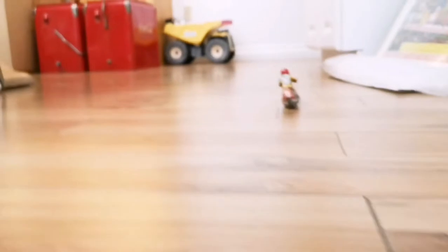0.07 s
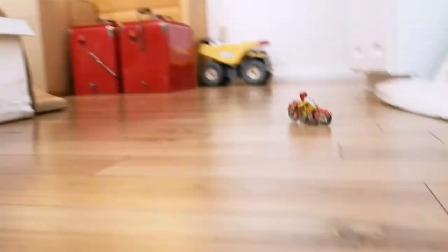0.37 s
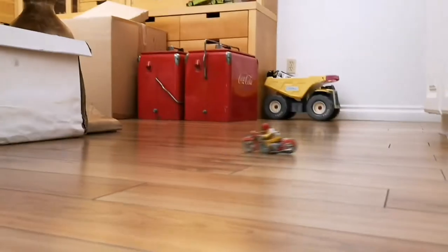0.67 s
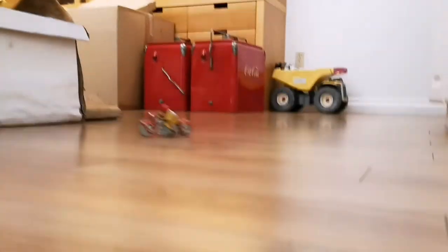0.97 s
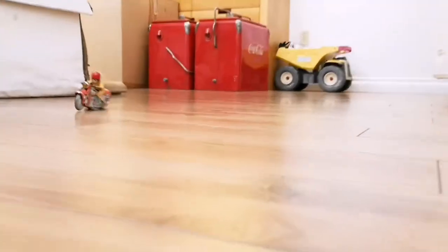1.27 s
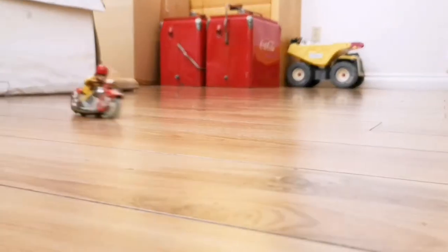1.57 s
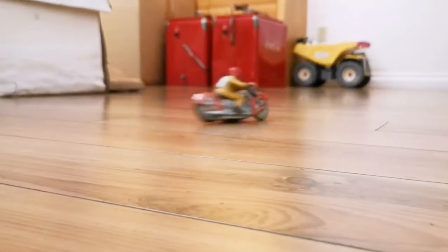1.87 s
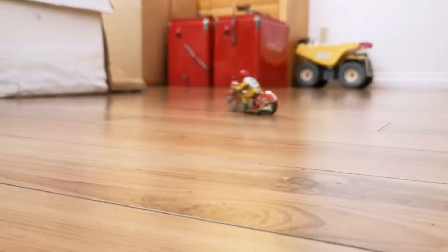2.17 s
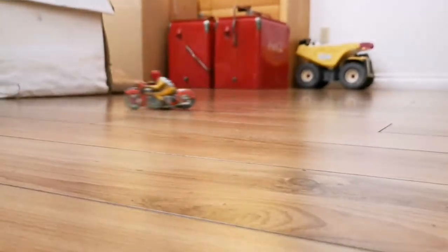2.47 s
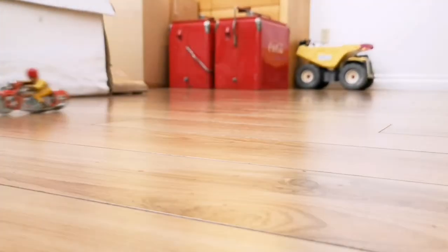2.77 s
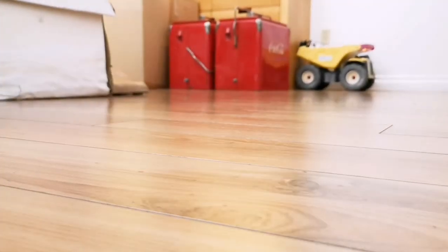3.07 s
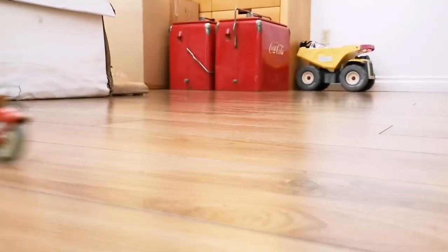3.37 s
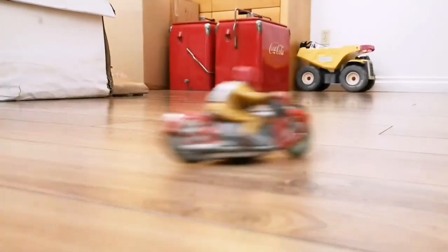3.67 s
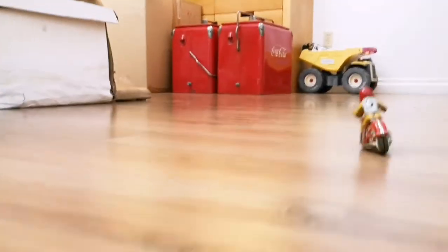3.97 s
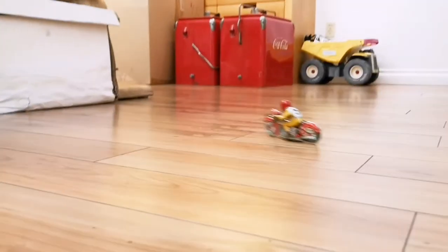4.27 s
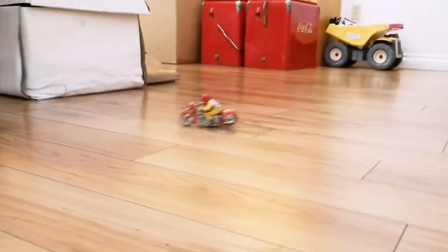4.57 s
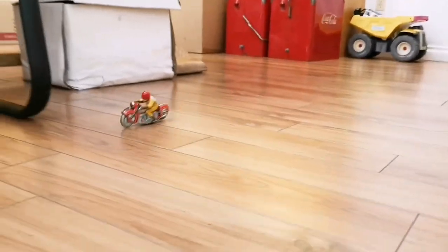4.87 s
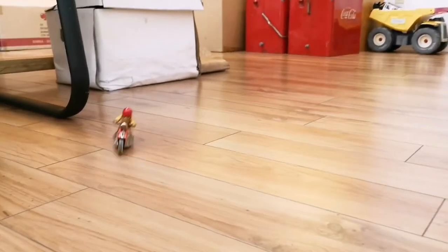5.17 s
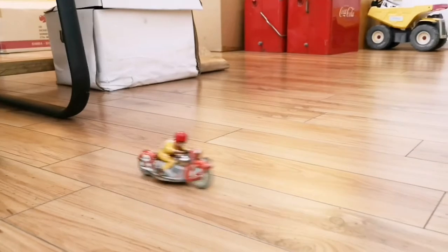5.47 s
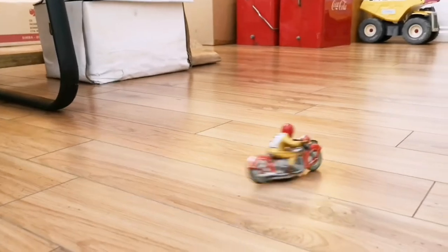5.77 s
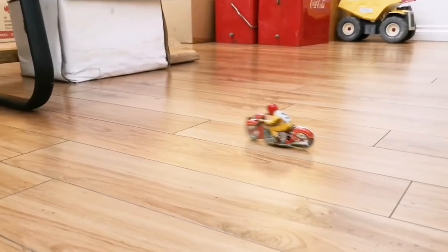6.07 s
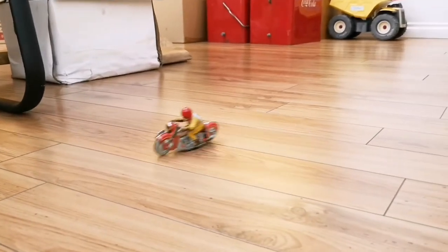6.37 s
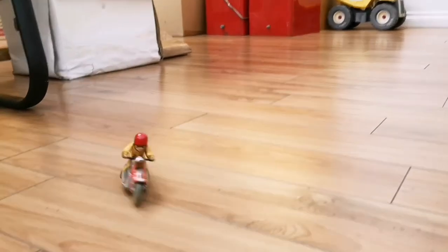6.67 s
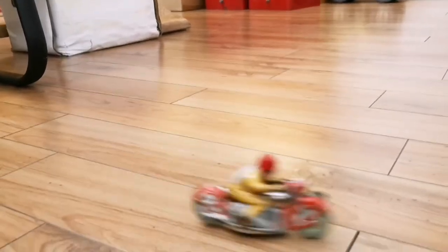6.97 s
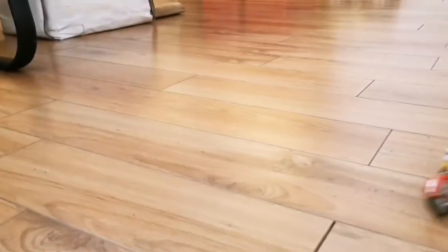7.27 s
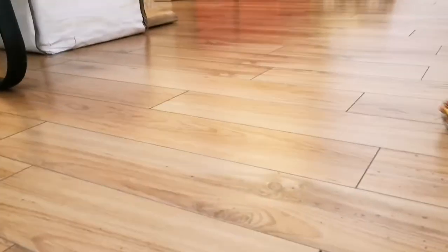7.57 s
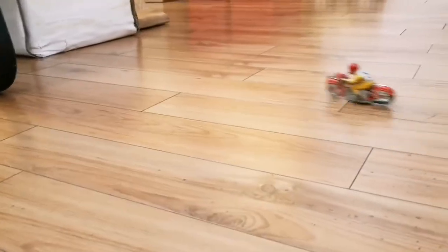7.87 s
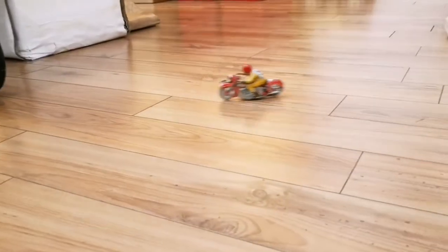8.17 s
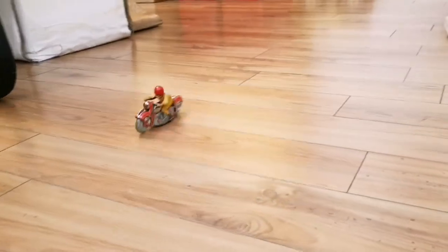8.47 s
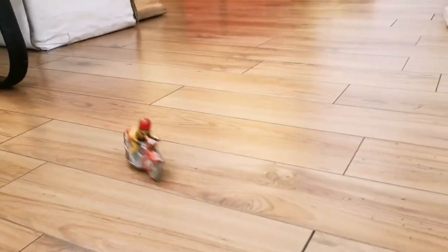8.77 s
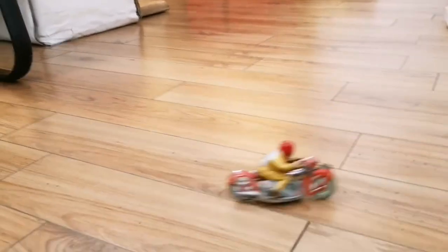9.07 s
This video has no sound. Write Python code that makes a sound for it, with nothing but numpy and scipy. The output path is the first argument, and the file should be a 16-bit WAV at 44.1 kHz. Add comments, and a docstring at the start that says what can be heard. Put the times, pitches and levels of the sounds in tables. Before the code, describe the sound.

A bright, buzzing metallic whirr runs throughout as a wind-up toy motorcycle drives laps on floorboards indoors. Its tin shell ticks and pings, and its wheels rattle unevenly with a brief scuff or two. The toy shifts in direction and brightness, often leaning left, and gets louder on two close passes by the microphone. Occasional dull bumps and a quiet hum sit beneath it, with a short room echo.

```python
"""A rasping metallic whirr circles on a wooden floor: a clockwork tin motorcycle, passing close twice.
Gear teeth drive the resonances of its shell, and loose tin parts strike it, clinking and jingling.
The wheels clatter and scuff, exciting their frame and the boards. Distance and heading on each lap
set the brightness and direction. A small room reverberates over a few soft bumps, a rumble and a hum."""
import sys
import numpy as np
from scipy import signal
from scipy.fft import rfft, irfft
from scipy.io import wavfile
from scipy.ndimage import map_coordinates

SR = 44100
rng = np.random.default_rng(int(sys.argv[2]) if len(sys.argv) > 2 else 0)


def log_audio(samples):
    """Write samples as a 16-bit WAV file to the path given in sys.argv[1]."""
    # one column per channel
    frames = np.atleast_2d(samples).T
    # limit to full scale, then quantise
    limited = np.clip(frames, -1, 1)
    pcm = np.round(limited * 32767).astype(np.int16)
    wavfile.write(sys.argv[1], SR, pcm)


N = 402191
TIME = np.arange(N) / SR

# The gear whirr. Each row: time in seconds, relative level in dB, left minus right in dB.
WHIRR_PATH = [(0.0, -31.5, 7.5), (0.53, -30.5, -4), (1.3, -28, 12.5), (1.8, -30.5, 14), (1.93, -33.5, 0),
              (2.35, -33, 8.5), (3.15, -27, 15), (3.6, -21, 7), (3.97, -30.5, -3.5), (4.24, -26, 1.5),
              (4.65, -32, 8), (5.3, -34, 5.5), (5.53, -32, 5), (5.9, -33.5, 5.5), (6.4, -35, 11),
              (6.8, -28, 5.5), (7.19, -23, 6), (7.5, -36.5, 0), (8.8, -37, -0.5), (9.12, -32, -5)]
# Modes of the tin body. Each row: frequency in Hz, 60 dB decay time in seconds, relative level in dB.
TIN_MODES = [(5695, .036, -5), (8412, .029, 1), (9365, .025, -5), (7590, .02, 0), (7920, .012, -3),
             (6630, .014, -9)]
# Spectra of the shell and of the teeth's fizz. Each row: frequency in Hz, relative level in dB.
SHELL_SPECTRUM = [(900, -46), (1600, -9), (3000, -12), (4300, -10.5), (5200, -3), (6400, -4), (7700, 7.5),
                  (8900, 3), (9900, -5), (11200, -19.5), (15500, -26.5)]
FIZZ_SPECTRUM = [(7000, -36), (9500, -8), (10500, 11.5), (11500, 5), (13000, 6.5), (15500, 0)]
# The shell's middle resonance and the fizz, strongest close by. Each row: time in seconds, level in dB.
MIDDLE_LEVEL = [(1.55, -49), (1.68, -27), (1.9, -54), (3.3, -40), (3.65, -34), (4.1, -66), (6.6, -50),
                (7.1, -41), (7.6, -44.5), (9.1, -44)]
FIZZ_LEVEL = [(0.0, -41), (0.07, -45), (1.35, -46.5), (1.73, -38.5), (1.93, -48), (2.56, -46),
              (3.63, -30.5), (3.66, -37), (3.91, -31), (4.52, -50), (5.84, -41), (5.99, -53), (6.76, -42.5),
              (7.11, -34.5), (7.42, -39), (7.54, -49), (8.33, -55), (9.12, -36)]
def gears(ticks_per_s=1100, beat_hz=190, rasp_db=9, middle_hz=6750):
    """Impact excitation: teeth tick into the shell in uneven beats, surging with the play in the train."""
    beat = np.cumsum(beat_hz * (1 + .2 * walk(60))) / SR % 1
    drive = unit(ticks(ticks_per_s, 5) * undb(0.83 * walk(70) + walk(18) - rasp_db * beat))
    whirr = undb(-3) * unit(colour(drive, SHELL_SPECTRUM)) + undb(-6.5) * resonate(drive, TIN_MODES[1:])
    middle = band(drive, middle_hz, width_hz=800) * undb(curves(MIDDLE_LEVEL)[0])
    low_sheen, high_sheen = sheen(drive)
    fizz = unit(colour(ticks(ticks_per_s, 5.2) * undb(walk(25)), FIZZ_SPECTRUM))
    fizz *= undb(curves(FIZZ_LEVEL)[0])
    return whirr * undb(curves(WHIRR_PATH)[0]) + middle, low_sheen, fizz + high_sheen


# Two shell resonances. Each row: time in seconds, relative levels of the lower and the upper in dB.
SHEEN_LEVELS = [(0.0, -54, -44), (0.07, -41, -46), (1.14, -60, -46), (1.4, -44, -32), (2.16, -40.5, -40),
                (3.12, -68, -50), (3.63, -34, -47), (4.62, -50, -48), (5.49, -58, -30.5),
                (5.69, -36.5, -50), (6.4, -52, -51), (6.65, -39, -33), (7.42, -37.5, -35), (7.67, -42, -49),
                (7.97, -31.5, -40), (8.15, -45, -44), (9.09, -43, -48), (9.12, -49, -51)]
def sheen(drive, lower_hz=5000, upper_hz=5400, high_hz=9400, swing_hz=550, rundown_db_per_s=2):
    """Forced resonance: two bands take turns; a third glides each lap and fades as the spring unwinds."""
    lower_db, upper_db = curves(SHEEN_LEVELS)
    lower = band(drive, lower_hz, width_hz=250) * undb(lower_db)
    upper = band(drive, upper_hz, width_hz=250) * undb(upper_db - 1)
    angle = lap_angle()
    heading_db = 6 * np.cos(angle - 2 * np.pi * 0.38)  # greatest 0.38 lap after the closest point
    high_db = -39 + circling()[0] + heading_db - rundown_db_per_s * TIME
    high = band(drive, high_hz + swing_hz * np.sin(angle), width_hz=550)
    return lower + upper, high * undb(high_db)


# Loose parts hit the shell. Each row: start in seconds, relative levels of blow and ring in dB.
CLINK_STRIKES = [(0.74, -17, -32), (1.465, -24, -45), (1.515, -24, -33), (1.708, -17, -29),
                 (1.8246, -16, -46), (2.442, -27, -23), (2.4663, -29, -18.5), (2.538, -35, -46),
                 (2.677, -34, -19.5), (2.716, -22, -24), (3.048, -28, -16), (3.1008, -20, -18),
                 (3.1303, -30, -17), (3.224, -14, -23), (3.272, -15, -21), (3.338, -18, -13.5),
                 (3.4276, -19, -27), (3.569, -16.5, -28), (3.698, -12.5, -34), (4.214, -17.5, -36),
                 (4.579, -34, -26), (4.647, -33, -22), (4.75, -24, -27), (4.906, -25, -39),
                 (5.073, -27, -26), (5.185, -25, -29), (5.546, -18, -40), (5.971, -15.5, -38),
                 (6.1083, -21, -40), (6.4185, -25, -30), (6.7385, -21, -21), (6.814, -14.5, -34),
                 (7.193, -13, -25), (7.386, -31, -23), (8.19, -28, -22)]
def clinks(buzz_t60=0.016, detune=0.002):
    """Free vibration: a loose part strikes the shell, buzzes against it and rings its strongest mode."""
    blows, buzz, rings = np.zeros((3, N))
    hz, t60, _ = TIN_MODES[1]
    for (s, blow_db, ring_db), bend in zip(CLINK_STRIKES, rng.standard_normal(len(CLINK_STRIKES))):
        add(blows, s, undb([blow_db + 19]))
        add(buzz, s, undb(blow_db + 6) * fade(buzz_t60))
        add(rings, s, undb(ring_db + 6) * ring(hz * (1 + detune * bend), t60))
    return colour(blows + buzz * rng.standard_normal(N), SHELL_SPECTRUM) + rings


# A loose tab hits the body. Each row: start in seconds, relative level in dB.
TAB_STRIKES = [(0.292, -20), (1.267, -23), (1.433, -20), (1.466, -19), (1.711, -21), (2.468, -18.5),
               (2.54, -18.5), (2.857, -20), (3.236, -18), (3.273, -27.0), (3.297, -19.5), (3.321, -26),
               (3.935, -32), (3.968, -20), (4.083, -29), (4.265, -17.5), (4.837, -23), (5.195, -27.0),
               (5.271, -20), (5.544, -23), (5.602, -24), (5.915, -18), (5.967, -24), (6.508, -22),
               (6.557, -18), (6.86, -18), (6.949, -31), (7.008, -16), (7.088, -19), (7.114, -23),
               (7.207, -16), (7.318, -29), (7.365, -21), (7.385, -13), (7.417, -17), (7.487, -27.5),
               (7.527, -17.5), (7.543, -30), (8.128, -24), (8.413, -18), (8.436, -22), (8.697, -22.5),
               (8.738, -22)]
def tab_pings(bounce_s=0.0045, detune=0.0021):
    """Impact and rebound: a tab ticks on the shell, rings its lowest mode and bounces once."""
    pings, taps = np.zeros((2, N))
    hz, t60, _ = TIN_MODES[0]
    for (s, db), (late, hard, bend) in zip(TAB_STRIKES, rng.standard_normal((len(TAB_STRIKES), 3))):
        add(taps, s, undb([db + 16]))
        add(pings, s, undb(db + 2.5) * ring(hz * (1 + detune * bend), t60))
        add(pings, s + bounce_s * (1 + .5 * np.tanh(late)), undb(db - 4 + 2 * hard) * ring(hz, t60))
    return pings + colour(taps, SHELL_SPECTRUM)


def jingle(ticks_per_s=170):
    """Overlapping decays: loose tabs strike so often that the body's modes ring without a break."""
    low = resonate(ticks(ticks_per_s, 3), TIN_MODES[:1])
    high = resonate(ticks(ticks_per_s, 3), TIN_MODES[1:3])
    return high * undb(curves(WHIRR_PATH)[0] - 7), low * undb(-41 + 0.61 * circling()[0])


# How hard the floor shakes the wheels. Each row: time in seconds, relative level in dB.
ROLL_LEVEL = [(0.0, -36.5), (0.56, -40.5), (0.96, -36), (1.17, -37.5), (1.7, -35.5), (2.18, -39),
              (3.6, -34.5), (5.26, -34.5), (5.56, -30), (6.04, -39.5), (6.53, -38.5), (6.99, -34),
              (7.31, -32), (7.49, -40), (7.77, -38.5), (8.18, -34.5), (8.63, -39.5), (9.12, -33.5)]
# Spectra of the wheels and of the boards. Each row: frequency in Hz, relative level in dB.
WHEEL_SPECTRUM = [(300, -43), (700, -14.5), (1150, -6.5), (1560, -10), (1740, 0.5), (2000, 1), (2330, -3.5),
                  (2540, -0.5), (2750, 2.5), (3600, -2), (4200, -8), (6500, -1.5), (12000, -52)]
BOARD_SPECTRUM = [(150, -16.5), (320, 7.5), (450, 22), (530, 12.5), (640, 8.5), (920, 10), (1130, 15.5),
                  (1500, 11.5), (3000, -27)]
# Wheel and frame modes. Each row: frequency in Hz, 60 dB decay time in seconds, relative level in dB.
FRAME_MODES = [(1692, 0.18, -2.5), (2571, 0.015, 1.5), (2844, 0.012, -8.5), (3520, 0.046, -20)]
def wheels(grit_per_s=260, frame_rise_db_per_s=0.88, cutoff_hz=1570, grain_db=5.2, hollow_db=6.9):
    """Rolling noise: the grain shakes wheels and boards, and rings the frame more as the run goes on."""
    roll_db = curves(ROLL_LEVEL)[0]
    grain = np.tanh(walk(40))
    grit = ticks(grit_per_s, 5) * undb(1.5 * grain)
    grating = undb(-1) * unit(colour(grit, WHEEL_SPECTRUM))
    frame = undb(-9.5 + frame_rise_db_per_s * TIME) * resonate(grit, FRAME_MODES)
    # the small frame hardly radiates below the cutoff
    radiation = signal.cheby1(6, 1, cutoff_hz, "high", fs=SR, output="sos")
    rolling = signal.sosfilt(radiation, undb(roll_db) * (grating + frame))
    board_drive = ticks(grit_per_s, 5) * undb(grain_db * grain + hollow_db * np.tanh(walk(22)))
    board_db = -43 + 0.23 * roll_db - 0.56 * circling()[0]
    return rolling + unit(colour(board_drive, BOARD_SPECTRUM)) * undb(board_db)


def wobble(turns_per_s=10, spread_db=3.5, jitter_turns=0.22):
    """Eccentric rotation: untrue wheels jolt lightly about once a turn; rows as in HARD_JOLTS."""
    turns = np.arange(int(N / SR * turns_per_s))
    late, hard, hollow = rng.standard_normal((len(turns), 3)).T
    s = (turns + jitter_turns * late) / turns_per_s
    db = np.interp(s, *np.transpose(ROLL_LEVEL)) + spread_db * np.tanh(hard)
    return np.transpose([s, db - 2, db - 7 + spread_db * np.tanh(hollow)])


# Wheels hit the floor and rebound. Each row: start in seconds, relative wheel and board levels in dB.
HARD_JOLTS = [(0.0419, -30.5, -31.5), (0.1606, -28, -34), (0.2863, -31, -37), (0.3692, -35, -42),
              (0.5707, -25.5, -51), (0.5837, -32, -57), (0.7643, -26, -38), (0.7872, -27.5, -41.5),
              (1.1344, -30.5, -41.5), (1.1574, -31.5, -38), (1.323, -30, -28.5), (1.4118, -28, -51),
              (1.4208, -26, -49), (1.4647, -25, -41), (1.4996, -25, -39.5), (1.6193, -22.5, -45.5),
              (1.6433, -32, -49), (1.759, -28, -50), (1.8558, -26.5, -52), (2.2399, -26, -29.5),
              (2.2838, -25, -42), (2.8515, -23, -45), (2.9174, -26.5, -35), (2.9463, -24, -34),
              (3.0211, -21, -47), (3.0341, -38, -50), (3.0481, -23.5, -55), (3.1359, -22.5, -41),
              (3.1588, -26.5, -47), (3.2217, -20.5, -41), (3.2915, -25.5, -55), (3.3853, -24, -35),
              (3.54, -22.0, -42), (3.6437, -18.5, -31), (3.7006, -21, -30.5), (3.8423, -28, -31),
              (3.9101, -27.5, -36.5), (4.0009, -24.5, -38), (4.0847, -24, -25), (4.1216, -40, -29),
              (4.1665, -25.5, -26.5), (4.488, -26, -37), (4.8051, -26.0, -39), (4.9039, -30, -40),
              (4.9787, -25, -43), (5.1872, -30, -37), (5.2551, -19.5, -37.0), (5.267, -24, -51),
              (5.3838, -24, -42), (5.4297, -23.5, -37.5), (5.5444, -23, -55), (5.5953, -15.5, -44),
              (5.6362, -20, -42), (5.6482, -24, -33.5), (5.7779, -29.5, -41), (5.8178, -28.5, -45),
              (5.8926, -26, -39), (5.9724, -22.5, -34), (6.0363, -25, -50), (6.1071, -23.5, -42),
              (6.1271, -31, -46), (6.144, -44, -62), (6.2528, -36, -36), (6.2678, -23, -53),
              (6.4194, -24, -38.5), (6.4922, -31, -36), (6.5411, -25, -37.5), (6.6339, -24.5, -36.5),
              (6.6459, -39, -47), (6.7397, -18, -44), (6.7546, -35, -41.5), (6.7776, -25.5, -46.0),
              (6.7946, -28.5, -51), (6.8045, -30, -47), (6.8155, -21, -46), (6.8315, -24.0, -47),
              (6.8674, -23, -42.0), (6.8903, -21, -48), (6.9602, -23, -39), (6.9991, -24, -32),
              (7.02, -22, -41), (7.046, -21, -44), (7.0689, -23, -37), (7.105, -26, -27),
              (7.1966, -29, -36), (7.2715, -25, -35), (7.345, -29, -35), (7.383, -34, -32),
              (7.4235, -27, -32), (7.47, -30, -38), (7.662, -30.5, -29.5), (7.9859, -30, -54),
              (8.0497, -23, -48), (8.1126, -30, -50), (8.1275, -30, -60), (8.2163, -22, -56),
              (8.2303, -31, -53), (8.3081, -29, -53), (8.3191, -26.0, -45), (8.4109, -28, -48),
              (8.5067, -26.0, -43.5), (8.5675, -20.5, -44), (8.58, -27.5, -46), (8.6952, -21, -38),
              (8.783, -23.5, -37), (8.806, -22.5, -40), (8.82, -24.0, -44), (8.8678, -18, -34),
              (8.8895, -24, -43), (8.9866, -22, -44), (9.0135, -29, -38), (9.0255, -22.5, -35),
              (9.0854, -24, -42)]
def jolts(chatter_t60=0.058, board_t60=0.092, detune=0.048, contact_hz=5000):
    """Impact noise: each jolt clacks and chatters in the wheels, rings the frame and sounds the boards."""
    clacks, chatter, thuds, clang = np.zeros((4, N))
    blows = np.vstack([HARD_JOLTS, wobble()])
    chances = rng.standard_normal((len(blows), len(FRAME_MODES), 2))
    for (s, wheel_db, board_db), chance in zip(blows, chances):
        add(clacks, s, undb([wheel_db + 20]))
        add(chatter, s, undb(wheel_db + 6.5) * fade(chatter_t60))
        add(thuds, s, undb(board_db - 2) * fade(board_t60))
        # each blow lands on another spot and favours other modes
        for (hz, t60, db), (favour, bend) in zip(FRAME_MODES[1:], chance):
            add(clang, s, undb(wheel_db + 2.5 + db + 2 * favour) * ring(hz * (1 + detune * bend), t60))
    contact = lowpass(clacks + chatter * ticks(2500, 4.8), contact_hz)
    return clang + colour(contact, WHEEL_SPECTRUM) + colour(thuds * rng.standard_normal(N), BOARD_SPECTRUM)


# A tyre slips. Each row: start in seconds, length in seconds, level in dB, pitch in Hz.
TYRE_SLIPS = [(4.095, 0.1, -36.5, 495), (7.166, 0.045, -41, 438)]
def scuffs():
    """Sliding friction: a tyre drives a narrow band of the boards into a groan that swells and dies."""
    groans = np.zeros(N)
    for s, length, db, hz in TYRE_SLIPS:
        swell = np.sin(np.pi * np.clip((TIME - s) / length, 0, 1))
        groans += undb(db) * swell * band(rng.standard_normal(N), hz, width_hz=120)
    return groans


# The closest point of each lap. Each row: time in seconds, distance in metres, relative leftward pan.
LAP_PASSES = [(0.0, 0.67, 13), (1.72, 2.45, 1), (3.66, 0.3, 1.5), (5.78, 0.59, 1), (7.09, 0.1, 0.5),
              (9.12, 0.43, -3.5)]
def lap_angle():
    """Circular motion: the angle in radians grows by one turn from each closest point to the next."""
    return 2 * np.pi * np.interp(TIME, np.transpose(LAP_PASSES)[0], np.arange(len(LAP_PASSES)))


def circling(radius_m=0.3):
    """Inverse-distance law on a circle: returns the gain in dB and the rightward bearing, -1 to 1."""
    angle, closest = lap_angle(), curves(LAP_PASSES)[0]
    across = radius_m * np.sin(angle)
    distance = np.hypot(across, closest + radius_m * (1 - np.cos(angle)))
    return -20 * np.log10(distance), across / distance


# Soft low bumps. Each row: start in seconds, relative level in dB, pitch in Hz.
SOFT_BUMPS = [(1.322, -10.5, 244), (2.002, -31.5, 330), (3.739, -23.5, 260), (7.426, -22, 486),
              (7.962, -25, 298), (8.391, -30.5, 285)]
def bumps(tail_t60=0.099, crack_t60=0.013):
    """Heavily damped impact: one push and its rebound, with a crack of contact and a faint low tail."""
    knocks, tails, cracks = np.zeros((3, N))
    for s, db, hz in SOFT_BUMPS:
        cycle = np.arange(int(SR / hz)) * hz / SR
        add(knocks, s, undb(db) * np.sin(2 * np.pi * cycle) * np.sin(np.pi * cycle))
        add(tails, s, undb(db - 16) * fade(tail_t60))
        add(cracks, s, undb(db - 14) * fade(crack_t60))
    cracks *= noise([(1000, -3), (3000, -18), (6000, 4)])
    tails *= noise([(60, 5), (450, 5), (900, -18), (4000, -43)])
    return knocks + cracks + tails


# The room's rumble. Each row: frequency in Hz, relative level in dB.
RUMBLE_SPECTRUM = [(15, 0), (35, -1.5), (58, 1.5), (85, -3), (135, -14.5), (175, -14), (260, -25),
                   (450, -35), (700, -42), (4000, -29.5), (15000, -41)]
# A wavering low hum. Each row: time in seconds, relative level in dB.
DRONE_LEVEL = [(0.0, -51.5), (0.24, -35.5), (0.6, -49), (1.73, -41.5), (1.8, -48.5), (2.01, -32.5),
               (2.33, -47.5), (2.69, -38.5), (3.89, -57), (6.65, -51.5), (8.36, -79), (8.46, -61),
               (9.12, -82)]
def background(mains_hz=118, drone_hz=194):
    """Random modulation: two hums waver in level and pitch over a rumble, nearly alike on both sides."""
    rumble = undb(-38) * noise(RUMBLE_SPECTRUM)
    side = undb(-60) * noise([(40, -2), (130, -31), (300, -14), (1000, 6)])
    mains = undb(-47 + 2 * walk(9.5)) * np.sin(phase(mains_hz + 2.497 * walk(23)))
    drone_db = curves(DRONE_LEVEL)[0] - 1 + 6.7 * np.tanh(walk(45))
    drone = undb(drone_db) * np.sin(phase(drone_hz + 3.55 * walk(70)))
    return rumble + np.sqrt(2) * (mains + drone) + np.array([side, -side])


def room(x, pan_db, early_db=5, late_db=3, early_t60=0.055, late_t60=0.33, lag_s=0.0004794, size=8192):
    """Reverberation: direct sound, early scatter off floor and furniture, and a short diffuse tail."""
    decay = np.exp(-np.log(1000) * np.arange(size) / SR / np.array([[early_t60], [late_t60]]))
    power = undb([early_db, late_db]) ** 2 @ (decay ** 2 / np.sum(decay ** 2, axis=1, keepdims=True))
    padded, window = np.pad(x, size), np.sin(np.pi * np.arange(size) / size)
    echoes = np.zeros((2, N + 3 * size))
    for start in range(0, N + size, size // 2):
        piece = padded[start:start + size] * window
        response = np.sqrt(power) * rng.standard_normal((2, size))  # echoes change as the toy moves
        echoes[:, start:start + 2 * size - 1] += signal.fftconvolve(piece[None], response, axes=1)
    # the direct sound reaches first one side, then the other
    direct = np.array([x, map_coordinates(x, [(TIME + lag_s * walk(2)) * SR], order=3)])
    sides = undb(np.array([pan_db, -pan_db]) / 2)
    total_power = np.mean(sides ** 2, axis=0) * (1 + power.sum())
    return (direct + echoes[:, size:size + N]) * sides / np.sqrt(total_power)


def undb(db):
    """Decibels to gain."""
    return 10 ** (np.asarray(db) / 20)


def unit(x):
    """Normalisation to an rms of 1."""
    return x / np.sqrt(np.mean(x ** 2))


def curves(table):
    """Linear interpolation of a table's columns in time."""
    s, *columns = np.transpose(table)
    return [np.interp(TIME, s, c) for c in columns]


def add(track, s, sound):
    """Superposition of a short sound on a track at s seconds."""
    start = int(np.clip(s * SR, 0, N - 1))
    track[start:start + len(sound)] += sound[:N - start]


def colour(x, points, size=4096):
    """Minimum-phase filtering to a shape of (Hz, dB) points."""
    hz, db = np.transpose(points)
    grid = np.maximum(np.arange(size // 2 + 1) * SR / size, 1)
    cepstrum = irfft(np.log(undb(np.interp(np.log(grid), np.log(hz), db))))
    cepstrum[1:size // 2] *= 2
    cepstrum[size // 2 + 1:] = 0
    return signal.fftconvolve(x, irfft(np.exp(rfft(cepstrum))))[:len(x)]


def noise(spectrum):
    """Coloured noise, rms 1."""
    return unit(colour(rng.standard_normal(N), spectrum))


def lowpass(x, hz):
    """Second-order low-pass filtering."""
    return signal.sosfilt(signal.butter(2, hz, fs=SR, output="sos"), x)


def phase(hz):
    """Phase in radians, the integral of a steady or moving frequency."""
    return 2 * np.pi * np.cumsum(np.broadcast_to(hz, N)) / SR


def band(drive, hz, width_hz):
    """Heterodyne filtering: the band round a centre frequency, rms 1."""
    carrier = np.exp(1j * phase(hz))
    return unit(np.real(carrier * lowpass(drive / carrier, width_hz / 2)))


def fade(t60):
    """Exponential decay by 60 dB in t60 seconds."""
    return np.exp(-np.log(1000) * np.arange(int(t60 * SR) + 2) / (t60 * SR))


def ring(hz, t60):
    """Damped oscillation of one struck mode."""
    decay = fade(t60)
    return decay * np.sin(2 * np.pi * hz * np.arange(len(decay)) / SR)


def resonate(drive, modes):
    """Modal superposition: impacts convolved with each mode's ring, rms 1."""
    return unit(sum(undb(db) * unit(signal.oaconvolve(drive, ring(hz, t60))[:N]) for hz, t60, db in modes))


def walk(rate):
    """Random wander through rate points a second, rms 1."""
    steps = rng.standard_normal(N // 100)
    return unit(np.interp(TIME * rate, np.arange(len(steps)), steps))


def ticks(rate, spread_db):
    """Shot noise: irregular tiny impacts of unequal size, rms 1."""
    impulses = (rng.random(N) < rate / SR) * np.sign(rng.standard_normal(N))
    return unit(impulses * undb(spread_db * np.clip(rng.standard_normal(N), -2, 2)))


def scene():
    """Directional radiation: each part sounds its own way into the room; treble swings wider than wheels."""
    whirr, low_sheen, fizz = gears()
    high_jingle, low_jingle = jingle()
    rolling, clatter = wheels(), jolts()
    lap_pan, bearing = curves(LAP_PASSES)[1], circling()[1]
    wheel_pan_db, shell_pan_db = 0.23 * lap_pan, curves(WHIRR_PATH)[1] - 4
    toy = (room(rolling + scuffs(), wheel_pan_db)
           + room(clatter, wheel_pan_db, early_db=-1, late_db=-1.5, early_t60=0.021)
           + room(low_sheen + low_jingle, 6 * lap_pan - 5 * bearing)
           + room(tab_pings(), lap_pan - 5 * bearing, early_db=-2, late_db=-15)
           + room(clinks(), shell_pan_db, early_db=1, late_db=-4.5)
           + room(whirr + high_jingle, shell_pan_db, early_db=2.5, late_db=-4.5)
           + room(fizz, -6 - 18 * bearing))
    return toy + bumps() + background()


# Two microphone ports, alike in the bass only. Each row: frequency in Hz, left minus right in dB.
PORT_BASS = [(600, 0)]
PORT_TREBLE = [(1500, -1.5), (2100, -4), (3500, 0), (5600, -2.5), (7000, -1), (8300, 12.5), (8900, -5),
               (9400, -9), (10100, -3), (11500, 1), (13300, -9), (14700, 17)]
def record(dry, top_hz=15250):
    """Filtering and saturation: each port colours the treble, peaks are rounded and the top is cut off."""
    ported = [colour(x, [(hz, sign * db / 2) for hz, db in PORT_BASS + PORT_TREBLE])
              for x, sign in zip(dry, (1, -1))]
    return signal.sosfilt(signal.ellip(10, .2, 80, top_hz, fs=SR, output="sos"), np.tanh(ported))


dry = scene()
out = record(dry)
log_audio(out)
```